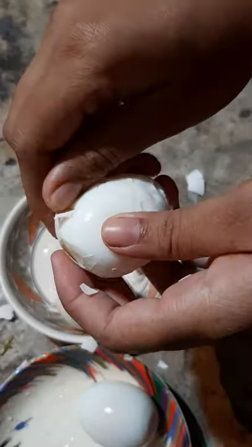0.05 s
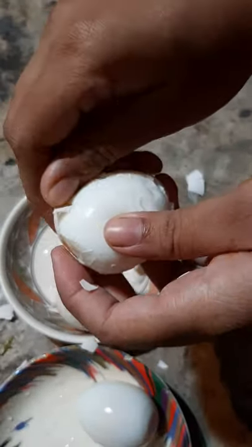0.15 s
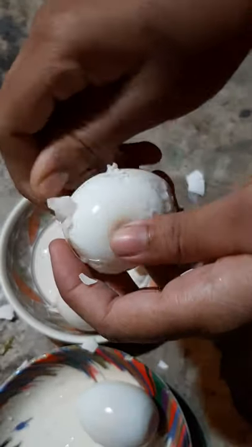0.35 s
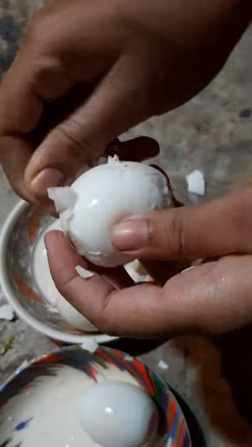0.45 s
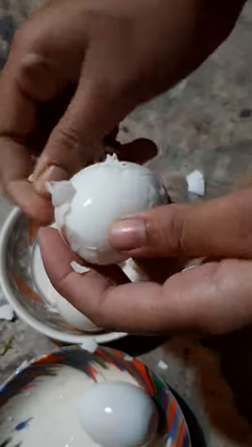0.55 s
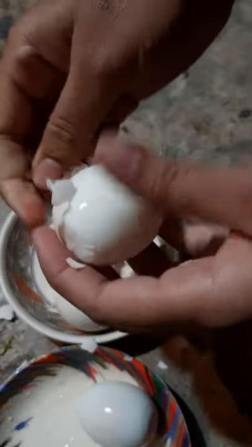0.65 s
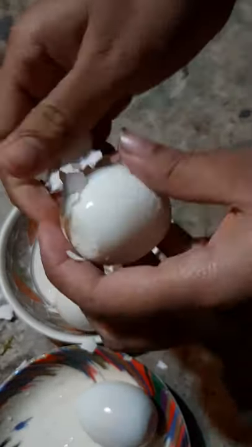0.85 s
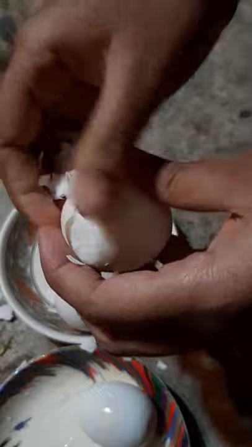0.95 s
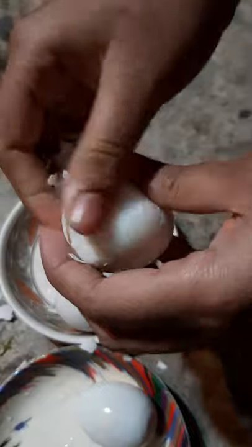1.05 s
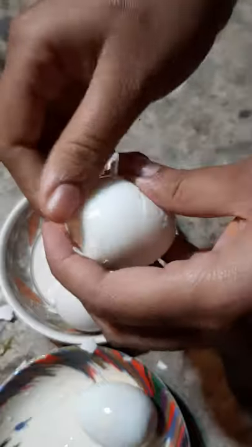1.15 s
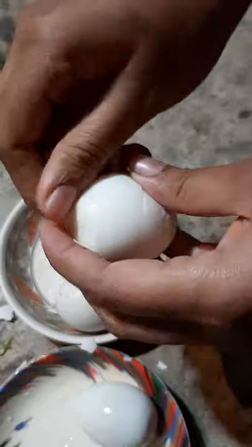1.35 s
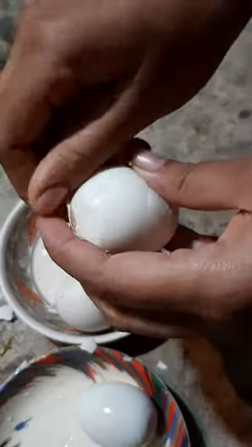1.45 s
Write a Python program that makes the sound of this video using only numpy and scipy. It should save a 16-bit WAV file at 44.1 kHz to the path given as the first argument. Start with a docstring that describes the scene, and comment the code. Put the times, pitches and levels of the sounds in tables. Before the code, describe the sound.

Eggshell cracks and peels off a boiled egg under fingers: faint ticks, a sharp cluster of bright snaps, then sparse tiny crackles and two later bursts, close stereo microphone in a quiet, hard-walled kitchen.

```python
"""A steady hiss is heard first, over a wavering low rumble and a faint far rush: all are shaped noise.
Almost at once fingers tear the skin and crack the shell of a boiled egg close to a pair of microphone ports.
Each snap is a millisecond burst ringing the shell flake and the egg, under a bright noise edge.
Tiny crackles are clicked resonators, tears are dense grit, a knock and a squeak are sines.
A quiet hard-walled kitchen answers with echoes that thicken into decaying noise."""
import sys
import numpy as np
from scipy import signal
from scipy.fft import rfft, irfft
from scipy.io import wavfile

SR = 44100
rng = np.random.default_rng(int(sys.argv[2]) if len(sys.argv) > 2 else 0)


def boost(x):
    """Linear amplitude factor 10**(x/20) for a level x in decibels (scalar or array-like)."""
    u = np.asarray(x, float) / 20
    return 10 ** u


def digitize_waveform(pressure):
    """Quantize a signal to 16-bit integers and store it at the path in sys.argv[1].

    Rows of a 2-D input are taken as channels; values are limited to [-1, 1].
    """
    field = np.atleast_2d(pressure).T
    bounded = np.clip(field, -1, 1)
    quanta = np.round(bounded * 32767).astype(np.int16)
    wavfile.write(sys.argv[1], SR, quanta)


N = 66150

# Spectrum of the hiss. Each row: frequency in Hz, relative density in dB per Hz.
HISS_SPECTRUM = [(180, -31), (300, -14), (384, -3), (621, 0), (1000, -15), (1470, -3.5), (1620, -17.5),
                 (2080, -20.5), (2750, -26), (3350, -17), (3760, -19), (4160, -11), (4670, -6.5),
                 (5690, -11.5), (7790, 3), (10300, -33), (15600, -1.5)]
HISS_DB = -70.5  # rms
# Spectrum of the rumble. Each row: frequency in Hz, relative density in dB per Hz.
RUMBLE_SPECTRUM = [(18, -41), (30, -21), (54, -4.5), (75, 0), (111, -4.5), (225, -13.5), (299, -11),
                   (333, -18), (400, -20), (520, -50), (880, -120)]
# Wavering of the rumble. Each row: time in seconds, level in dB.
RUMBLE_LEVEL = [(0.0, -77), (0.354, -68), (0.484, -75.5), (0.692, -72.5), (0.776, -81), (0.818, -69.5),
                (1.086, -77), (1.336, -74), (1.382, -79), (1.5, -72)]
# Correlation of the background at the two ports. Each row: frequency in Hz, left-right likeness (1 is equal).
BACKGROUND_LIKENESS = [(60, 0.97), (240, 0.56), (950, 0.2), (3770, 0.04), (15000, -1.2)]
# Balance of the background. Each row: frequency in Hz, left over right in dB.
BACKGROUND_BALANCE = [(60, -6.5), (380, -1), (2380, -8.5), (15000, -7)]

# Swell of the far rush. Each row: time in seconds, level in dB before the resonance gains.
RUSH_LEVEL = [(0.0, -89), (0.278, -74.5), (0.454, -79), (0.604, -104), (0.876, -84), (1.06, -81),
              (1.248, -79), (1.5, -75)]
# Broad resonances of the rush. Each row: frequency in Hz, width in Hz, gain in dB.
RUSH_RESONANCES = [(1327, 160, -3), (1530, 80, 0), (4590, 1600, 6.5)]
RUSH_PAN_DB = -12.5  # left over right

# Tears of the skin under the shell. Each row: start in seconds, length in seconds, level in dB.
SKIN_TEARS = [(.005, 0.021, -63.5), (0.191, 0.0099, -58.5), (0.231, 0.011, -46), (0.571, 0.052, -60),
              (0.729, .08, -75), (0.903, 0.0075, -55.5), (1.217, 0.025, -51), (1.407, 0.053, -57)]
TEAR_GRAINS_PER_S, TEAR_LOW_HZ, TEAR_HIGH_HZ = 1600, 4200, 15100
PORT_LIKENESS = .6  # correlation of the grit at the two ports

# Snaps of the shell. Each row: time in seconds, flake peak in dB, flake pitch in Hz, egg ring in dB re
# the flake peak, touched egg pitch in Hz, bright edge in dB re the flake peak, left over right in dB.
SHELL_SNAPS = [(0.0092, -48.5, 7330, -9, 1440, -5, -5.5), (0.0205, -45, 6800, -17.5, 1510, -13, -9.5),
               (0.068, -32.5, 7460, -4, 2230, -10.5, -10.5), (0.1514, -57, 4070, -3, 3060, 1.5, 2),
               (0.198, -42.5, 5800, -26, 2570, -8, 8), (0.201, -36, 6370, -21.5, 2330, -9.5, -15.5),
               (0.2342, -45.5, 6300, -11, 2520, 2, -12), (0.2381, -40.5, 6100, -17, 2500, -5, -26),
               (0.2416, -17, 6345, -25.5, 2630, -5, -14), (0.2447, -21.5, 6960, -28, 2380, 4, -3.9),
               (0.2464, -13.5, 6830, -22, 2260, -11.5, 5.5), (0.2473, -11, 7340, -21.5, 2410, -17, -10.5),
               (0.2485, -21, 7950, -24.5, 2200, -0.5, 11.5), (0.251, -26.5, 7800, -22, 2160, -2.5, -18.5),
               (0.2598, -35.5, 6200, -20.5, 2600, -4.5, -9.5), (0.2813, -19.5, 7040, -24.5, 2550, -30, -6),
               (0.3505, -31.5, 6500, -19.4, 2560, -4, -3), (0.3787, -21.5, 7820, -25.5, 2600, -6.5, -2.1),
               (0.3801, -30.5, 7470, -12, 2500, -3.5, -1), (0.384, -32.5, 6860, -33, 2300, 4.5, -3),
               (0.3979, -39.5, 7500, -6.5, 2500, -6.5, -12.5), (0.5837, -47, 7700, -8, 2150, -7, -2.5),
               (0.5986, -44.5, 7730, -17, 2580, -12.6, -4.5), (0.6053, -43.5, 7950, -11, 2490, -11, -6),
               (0.6172, -43.5, 7130, -10, 2560, -18, -8), (0.7274, -55.5, 7750, -25.5, 2480, -13.0, -7),
               (0.7505, -64.5, 7380, -12, 2360, 7, 6), (0.76, -52, 7600, -13, 2250, -6, -4.5),
               (0.795, -51, 7600, -29.0, 2040, -11, -11), (0.9008, -42.5, 7170, -18, 2850, 7.5, -6),
               (0.9029, -51.5, 7170, -11.5, 3200, 11.5, -15.5), (0.9039, -62, 7060, -24, 3000, -9, -8.5),
               (0.9123, -58, 7760, -19.5, 1540, -2, -24), (0.9852, -60, 4400, -23, 1880, 12, -6),
               (1.0509, -53.5, 6850, -12, 1556, 0, 6.5), (1.0751, -61, 5310, 10, 2700, -1, -13),
               (1.1267, -47.5, 6270, -16.7, 1620, 8.5, 1.5), (1.168, -40.5, 6870, -13.5, 2180, 1.5, -3.5),
               (1.2251, -39, 7100, -33, 3000, -6, -4), (1.2325, -41, 7800, -17, 2440, -19, -11),
               (1.2358, -26.5, 7220, -17, 2700, -5, 6.5), (1.2389, -30, 7380, -28.5, 2630, -6.0, 14),
               (1.2392, -24, 6900, -14.5, 2720, 4, -8.6), (1.2412, -35, 7170, -23, 2480, 8.5, 4),
               (1.4163, -44, 6900, -24, 2400, -1, 2), (1.4225, -51, 7100, -11.4, 2470, -5, 17),
               (1.4265, -53, 7500, -20, 2100, 4, -1.6), (1.4293, -49, 7400, -29, 1870, -18, 12),
               (1.4403, -53, 7500, -1, 2660, -18, -0.0), (1.4486, -28, 6890, -6, 1600, 2, -3.6),
               (1.4616, -52, 6640, -13, 1600, -3, 17), (1.4906, -48.5, 6850, -14, 2020, 6, -2)]
# Partials of a shell flake. Each row: ratio to its pitch, relative level in dB.
FLAKE_PARTIALS = [(1.0, 5.5), (0.845, -11), (1.02, -5.5), (0.88, -3.5)]
# Modes of the egg. Each row: frequency in Hz, relative level in dB, 60 dB decay time in seconds.
EGG_MODES = [(1450, -2, .02), (1750, -5, .012), (2070, 5, .03), (2300, 0, .015), (2560, -1, .016),
             (3200, 2, .025)]
FLAKE_T60_S, EDGE_T60_S, RISE_S = .0045, .007, .00025
TRAIL_DB, TRAIL_T60_S = -16, .017  # grit trailing the click
EGG_FALL_DB_PER_OCTAVE, EGG_SCATTER_DB = 12, 2.5  # modes far from the touched pitch are rung less
EDGE_HZ, EDGE_DULL_HZ, EDGE_RING_HZ, EDGE_RING_DB = 9300, 12000, 10200, -22

# Strength of the tiny crackles. Each row: time in seconds, least level in dB.
CRACKLE_LEVEL = [(0, -59), (.1, -66), (.23, -57), (.3, -50), (.45, -83), (.6, -54), (.75, -69), (.95, -67),
                 (1.2, -68), (1.3, -59), (1.43, -62), (1.5, -74)]
CRACKLES_PER_S, CRACKLE_SPREAD_DB, CRACKLE_PAN_DB = 30, 5, 4

# Echoes of the kitchen. Each row: frequency in Hz, relative level in dB, 60 dB decay time in seconds.
ROOM_DECAY = [(487, -3.5, 1), (1300, -5, 0.4), (2500, -8, 0.43), (3500, 2.5, 0.46), (4630, -4, 0.66),
              (7500, -11, 0.43), (9120, -11, 0.4), (10260, -7, 0.29), (12000, -6, 0.368), (14000, -8, 0.78),
              (16000, -11.5, 0.13)]
FIRST_ECHO_S, SPARSE_ECHOES_PER_S, ECHOES_THICKEN_S = .009, 900, .06

# The thumb knocks the egg at the big crack.
# The one row: start in seconds, frequency in Hz, level in dB, 60 dB decay time in seconds.
THUMB_KNOCK = (.243, 850, -53, .028)
# Glide of a wet finger on the white. Each row: time in seconds, pitch in Hz, level in dB.
FINGER_SQUEAK = [(1.26, 3150, -95), (1.27, 3200, -66), (1.30, 3330, -66), (1.31, 3080, -72),
                 (1.335, 3180, -66), (1.345, 3330, -70), (1.39, 3450, -80)]

RIGHT_LAG_S = .00023
TOP_CUT_HZ = 17000


def rms_one(x):
    """Normalization of power: scale to unit rms."""
    return x / np.sqrt(np.mean(x ** 2) + 1e-20)


def peak_one(x):
    """Normalization of amplitude: scale to unit peak."""
    return x / np.abs(x).max()


def in_time(rows):
    """Linear interpolation of a (time, value) table at every sample."""
    s, value = np.transpose(rows)
    return np.interp(np.arange(N) / SR, s, value)


def at_hz(points, hz, axis=1):
    """Interpolation of a spectral table on a logarithmic frequency axis."""
    points = np.array(points)
    return np.interp(np.log(hz), np.log(points[:, 0] + 1), points[:, axis])


def pan(db):
    """Level difference between ports: left is raised and right lowered by half of it."""
    return boost(np.array([[db / 2], [-db / 2]]))


def pair(noise, alike):
    """Partial correlation: two channels from a shared and a differing noise."""
    alike = np.clip(alike, 0, 1)
    shared = np.sqrt((1 + alike) / 2) * noise[0]
    return shared + np.sqrt((1 - alike) / 2) * noise[1] * [[1], [-1]]


def ring(x, hz, t60):
    """Damped resonance: a unit click sets a decaying sine of height 1 ringing."""
    radius, angle = boost(-60 / (t60 * SR)), 2 * np.pi * hz / SR
    poles = [1, -2 * radius * np.cos(angle), radius * radius]
    return signal.lfilter([0, np.sin(angle)], poles, x + 1e-18)


def cut(x, hz, kind, order=4):
    """Butterworth high- or low-pass filtering; the order sets the slope."""
    return signal.sosfilt(signal.butter(order, hz, kind, fs=SR, output="sos"), x)


def bands(low, count):
    """Third-octave analysis: band centres in Hz with their band-pass filters."""
    edges = low * 2 ** (np.arange(count + 1) / 3)
    return [(np.sqrt(a * b), signal.butter(2, [a, b], "band", fs=SR, output="sos"))
            for a, b in zip(edges, edges[1:])]


def background(spectrum, low, count):
    """Spectral shaping of partly correlated noise, band by band, to unit rms."""
    white, out = rng.standard_normal((2, 2, N + SR)), 0
    for k, (hz, sos) in enumerate(bands(low, count)):
        band = signal.sosfilt(sos, white[k % 2])[:, SR:]  # the filters settle for a second
        stereo = pair(band, at_hz(BACKGROUND_LIKENESS, hz))
        out = out + boost(at_hz(spectrum, hz)) * pan(at_hz(BACKGROUND_BALANCE, hz)) * stereo
    return rms_one(out)


def hiss():
    """Stationary noise: a fixed spectrum at a fixed level."""
    return boost(HISS_DB) * background(HISS_SPECTRUM, low=311.5, count=18)


def rumble():
    """Amplitude modulation of low-frequency noise by a slow level curve."""
    return boost(in_time(RUMBLE_LEVEL)) * background(RUMBLE_SPECTRUM, low=30.7, count=10)


def rush():
    """Resonant filtering of noise, perhaps water in a pipe: each resonance acts twice."""
    out = 0
    for hz, width, db in RUSH_RESONANCES:
        t60 = np.log(1000) / (np.pi * width)
        once = ring(rng.standard_normal((2, N)), hz, t60)
        out = out + boost(db) * rms_one(ring(once, hz, t60))
    return out * boost(in_time(RUSH_LEVEL)) * pan(RUSH_PAN_DB)


def tears():
    """A dense random train of tiny ruptures, band-limited, that swells and quickly stops."""
    t, level = np.arange(N) / SR, 0
    for s, length, db in SKIN_TEARS:
        swell = np.sqrt(np.clip((t - s) / length, 0, 1))
        stop = np.clip(1 - (t - s - length) / 0.0046, 0, 1)
        level = level + boost(db) * swell * stop
    grit = rng.standard_normal((2, N)) * (rng.random(N) < TEAR_GRAINS_PER_S / SR)
    grit = cut(pair(grit, PORT_LIKENESS), TEAR_LOW_HZ, "high")
    return level * rms_one(cut(grit, TEAR_HIGH_HZ, "low", order=2))


def flake_ring(hz, click, grit, t):
    """Forced resonance: a click modulated to each partial, with grit, rings the shell flake."""
    out = 0
    for ratio, db in FLAKE_PARTIALS:
        tuned = click * np.cos(2 * np.pi * hz * ratio * t) / (RISE_S * SR)
        out = out + boost(db) * ring(tuned + grit, hz * ratio, FLAKE_T60_S)
    return cut(cut(out, 0.66 * hz, "high", order=6), 8400, "low", order=6)


def egg_ring(touched_hz, tick):
    """Modal excitation: the egg rings most in the modes near the touched pitch."""
    out = 0
    for (hz, db, t60), own_db in zip(EGG_MODES, rng.normal(0, EGG_SCATTER_DB, len(EGG_MODES))):
        fall_db = EGG_FALL_DB_PER_OCTAVE * abs(np.log2(hz / touched_hz))
        out = out + boost(db + own_db - fall_db) * ring(tick, hz, t60)
    return cut(cut(out, 1436, "high", order=6), 2600, "low")


def bright_edge(noise, t):
    """Two-stage decay of high-passed noise, which also excites one short high resonance."""
    decay = boost(-60 * t / EDGE_T60_S) + boost(TRAIL_DB - 60 * t / TRAIL_T60_S)
    edge = cut(pair(noise, PORT_LIKENESS) * decay, EDGE_HZ, "high", order=6)
    dulled = cut(edge, EDGE_DULL_HZ, "low", order=1)
    return dulled + boost(EDGE_RING_DB) * ring(edge, EDGE_RING_HZ, 0.0016)


def snap(hz, egg_db, egg_hz, edge_db, pan_db, size=2500):
    """Impulsive fracture: flake, egg and edge respond together, a little differently at each port."""
    t = np.arange(size) / SR
    noise = rng.standard_normal((3, 2, size))
    trail = boost(TRAIL_DB - 60 * t / TRAIL_T60_S)
    grit = pair(noise[0], PORT_LIKENESS) * trail / np.sqrt(RISE_S * SR)
    click = np.exp(-(t / RISE_S) ** 2) * (1 + .5 * pair(noise[1], PORT_LIKENESS))
    mix = peak_one(flake_ring(hz, click, grit, t))
    mix = mix + boost(egg_db) * peak_one(egg_ring(egg_hz, (t == 0) + grit))
    mix = mix + boost(edge_db) * peak_one(bright_edge(noise[2], t))
    return mix * pan(pan_db)


def snaps():
    """Superposition of the single fractures, each begun half a millisecond before its listed time."""
    out = np.zeros((2, N + SR))
    for s, db, *colour in SHELL_SNAPS:
        one, i = boost(db) * snap(*colour), int((s - .0005) * SR)
        out[:, i:i + one.shape[1]] += one
    return out[:, :N]


def crackles():
    """A random point process: sparse clicks of scattered size, dealt to 14 damped resonators."""
    scatter_db = CRACKLE_SPREAD_DB * np.minimum(rng.exponential(1, N), 3)
    sizes = boost(in_time(CRACKLE_LEVEL) + scatter_db) * rng.choice([-1, 1], N)
    born = rng.random(N) < CRACKLES_PER_S / SR
    dealt = rng.integers(0, 14, N)
    fine = 0
    for k, hz in enumerate(np.geomspace(4800, 13000, 14)):
        fine = fine + ring(sizes * born * (dealt == k), hz, 20.3 / hz)
    return cut(fine, 4000, "high") * pan(CRACKLE_PAN_DB)


def kitchen(x):
    """Reverberation by convolution: sparse echoes thicken to noise, dying band by band in each channel."""
    t = np.arange(SR) / SR
    share = np.clip(SPARSE_ECHOES_PER_S / SR * np.exp(t / ECHOES_THICKEN_S), 0, 1)
    present = rng.random((2, SR)) < share
    white = rng.standard_normal((2, 2, SR)) * present / np.sqrt(share)
    echo = 0
    for k, (hz, sos) in enumerate(bands(401.4, count=17)):
        t60 = at_hz(ROOM_DECAY, hz, axis=2)
        decay = boost(at_hz(ROOM_DECAY, hz) - 60 * t / t60)
        energy = t60 * SR / (6 * np.log(10))  # a long decay gets no more energy than a short one
        echo = echo + signal.sosfilt(sos, white[k % 2]) * decay / np.sqrt(energy)
    echo = echo * np.clip(t / FIRST_ECHO_S, 0, 1) ** 2
    return signal.fftconvolve(x, echo, axes=1)[:, :N]


def knock():
    """Damped free vibration: one soft, quickly decaying sine under the thumb."""
    s, hz, db, t60 = THUMB_KNOCK
    age = np.maximum(np.arange(N) / SR - s, 0)
    attack = np.minimum(age / 0.0015, 1)
    return boost(db - 60 * age / t60) * attack * np.sin(2 * np.pi * hz * age)


def squeak():
    """Frequency modulation: a faint gliding sine whose amplitude flutters at random."""
    t = np.arange(N) / SR
    at, pitch, level_db = np.transpose(FINGER_SQUEAK)
    flutter = 1 + .4 * rms_one(cut(rng.standard_normal(N), 60, "low", order=2))
    level = boost(np.interp(t, at, level_db, left=-150, right=-150))
    phase = 2 * np.pi * np.cumsum(np.interp(t, at, pitch)) / SR
    return level * flutter * np.sin(phase)


def right_lag(x):
    """Interaural-style delay as a linear phase shift: the left port hears the egg first."""
    delay_s = np.array([[-RIGHT_LAG_S / 2], [RIGHT_LAG_S / 2]])
    return irfft(rfft(x) * np.exp(-2j * np.pi * np.fft.rfftfreq(N, 1 / SR) * delay_s), N)


def scene():
    """Superposition: direct egg sound and its echoes over rumble and hiss of house and microphones."""
    below = hiss() + rumble() + rush()
    egg = tears() + snaps() + crackles() + knock() + squeak()
    return below + right_lag(egg) + kitchen(egg)


def low_pass(x):
    """Removes everything above the highest recorded frequency."""
    return signal.sosfilt(signal.butter(12, 16980, fs=SR, output="sos"), x)


def record(dry):
    """Band limitation: a steep low-pass removes the top of the mix."""
    top_cut = signal.cheby2(10, 60, TOP_CUT_HZ, fs=SR, output="sos")
    mix = signal.sosfilt(top_cut, dry)
    return low_pass(mix)


dry = scene()
out = record(dry)
digitize_waveform(out)
```